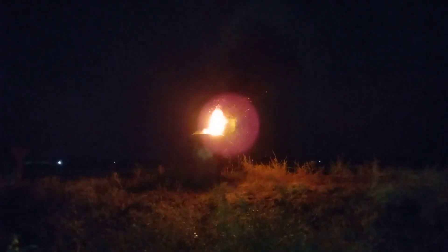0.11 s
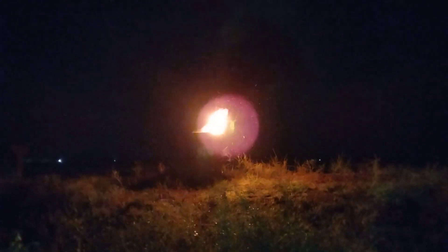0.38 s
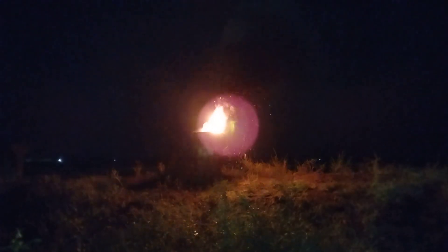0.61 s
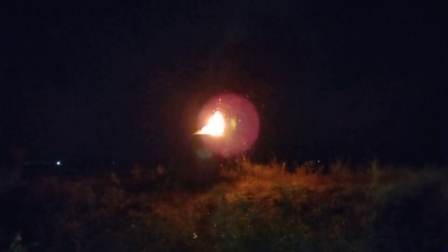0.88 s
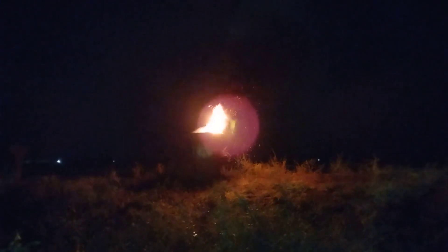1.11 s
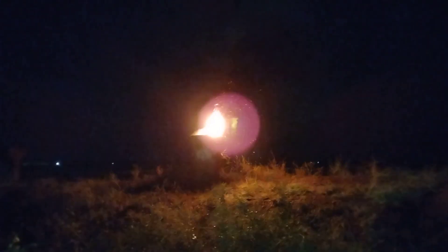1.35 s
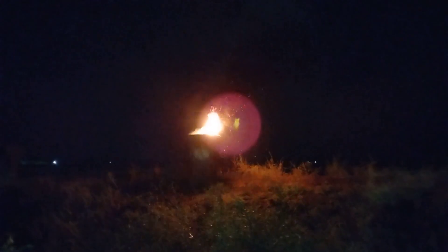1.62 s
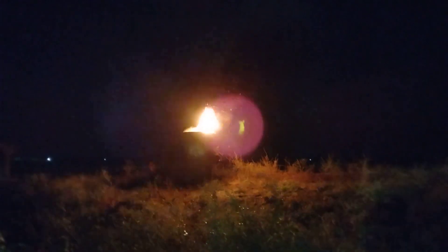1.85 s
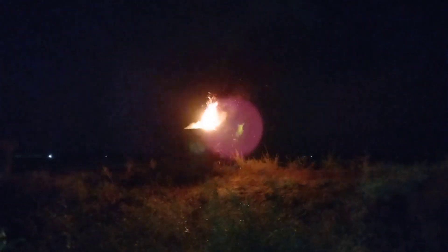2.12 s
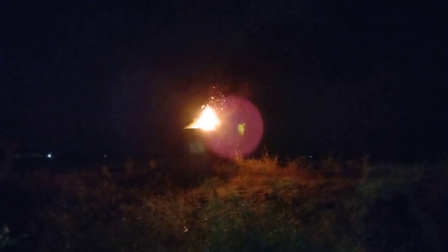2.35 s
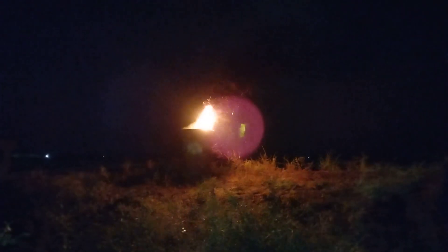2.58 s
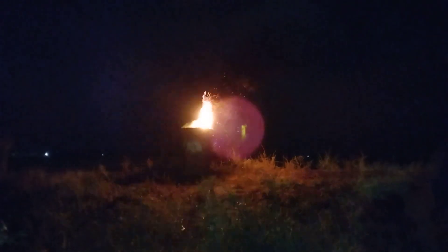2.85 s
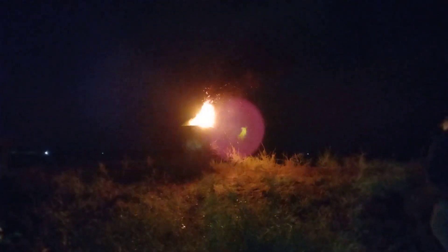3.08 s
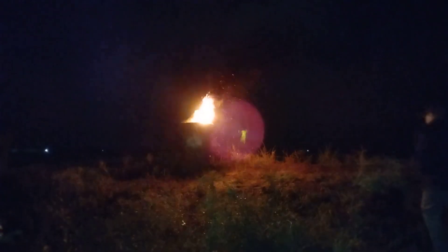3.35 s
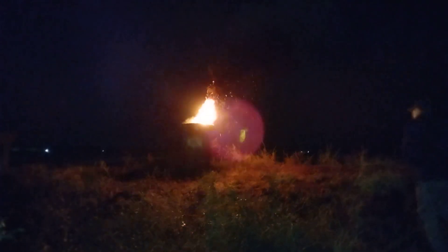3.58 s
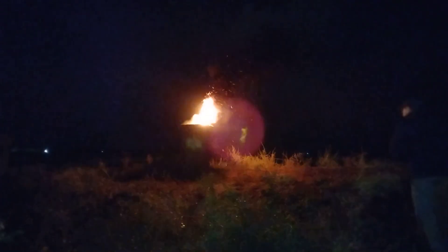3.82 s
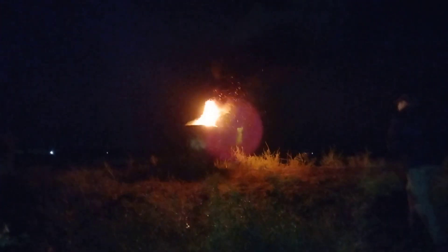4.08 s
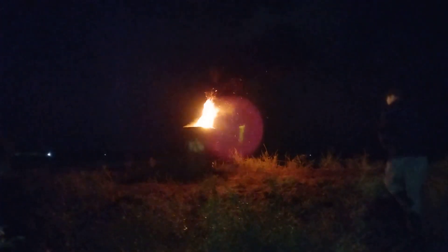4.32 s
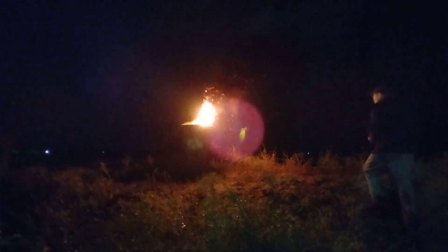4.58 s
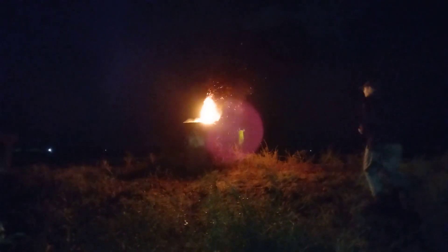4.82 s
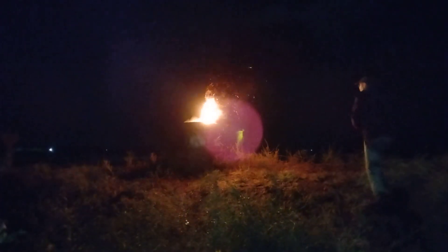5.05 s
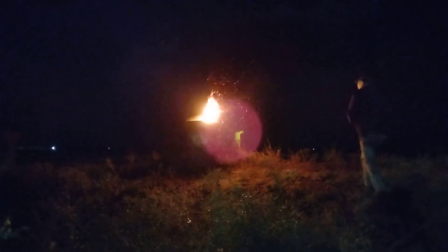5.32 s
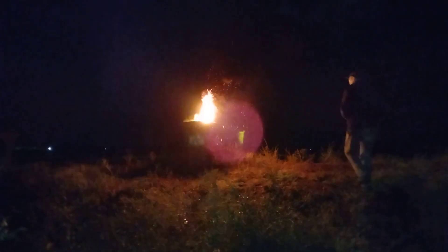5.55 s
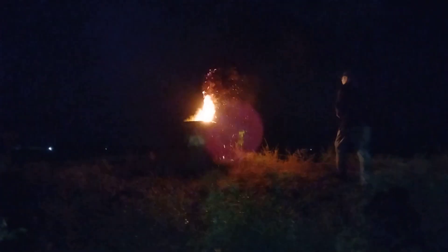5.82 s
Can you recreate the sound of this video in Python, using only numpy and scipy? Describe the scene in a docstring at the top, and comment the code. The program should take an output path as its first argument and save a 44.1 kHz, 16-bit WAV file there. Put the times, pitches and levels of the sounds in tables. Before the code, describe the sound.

Low fluttering wind buffets an unshielded microphone in a night field, with a few dry snaps from a far-off fire and thin steady hiss.

```python
"""A fire burns some way off in a field at night, heard through a bare microphone in the wind.
For two seconds gusts break on it: low noise flutters, eddies thump as smooth lobes of pressure and
sudden pressure steps pop. In the lull that follows, a few dry crackles ring as impulses through resonances.
From three seconds on, gusts return with more thumps and pops, up to the end.
Under all lie two bands of shaped noise: the soft roar of the flames and the hiss of the recorder."""
import sys
import numpy as np
from scipy import signal
from scipy.fft import rfft, irfft, next_fast_len
from scipy.io import wavfile
from scipy.ndimage import uniform_filter1d, minimum_filter1d, map_coordinates

SR = 44100
rng = np.random.default_rng(int(sys.argv[2]) if len(sys.argv) > 2 else 0)


def volts_from_decibels(level):
    """Turn decibel levels (scalar or array-like) into linear amplitude factors."""
    exponent = np.asarray(level, float) / 20
    return 10 ** exponent


def log_audio(samples):
    """Write samples as a 16-bit WAV file to the path given in sys.argv[1]."""
    # one column per channel
    frames = np.atleast_2d(samples).T
    # limit to full scale, then quantise
    limited = np.clip(frames, -1, 1)
    pcm = np.round(limited * 32767).astype(np.int16)
    wavfile.write(sys.argv[1], SR, pcm)


N = 261460  # length in samples


def unit(x):
    """Normalisation: scales a signal to rms 1."""
    return x / np.sqrt(np.mean(x ** 2) + 1e-20)


def filtered(x, response):
    """Linear filtering: multiplies the spectrum by a complex response of frequency in Hz."""
    size = next_fast_len(N + 8192)
    spectrum = rfft(x, size) * response(np.fft.rfftfreq(size, 1 / SR))
    return irfft(spectrum, size)[..., :N]


def noise(spectrum):
    """Spectral shaping: white noise coloured by (hz, db) points on a log frequency axis, rms 1."""
    hz, db = np.transpose(spectrum)
    colour = lambda f: volts_from_decibels(np.interp(np.log(f + 1), np.log(hz + 1), db))
    return unit(filtered(rng.standard_normal(N), colour))


def wobble(rate):
    """Slow random modulation: a smooth curve through `rate` random knots a second."""
    knots = rng.standard_normal(int(N * rate / SR) + 4)
    return map_coordinates(knots, [np.arange(N) * rate / SR])


def add(track, s, sound):
    """Superposition: mixes a sound into the track, starting at s seconds."""
    part = track[round(s * SR):][:len(sound)]
    part += sound[:len(part)]


def gusts():
    """Wind strength: a level in dB interpolated between points, sample by sample."""
    # course of the breeze: time_s, level_db
    breeze_points = [(0.0, -52.5), (0.43, -53.5), (0.76, -49.5), (1.02, -45.5), (1.43, -51), (1.82, -51),
                     (1.96, -50), (2.26, -55.5), (2.54, -51), (3.07, -51.5), (3.45, -52), (3.71, -48.5),
                     (3.86, -43.5), (4.06, -46.5), (4.48, -50), (4.57, -45.5), (5.32, -53), (5.93, -51)]
    s, db = np.transpose(breeze_points)
    return np.interp(np.arange(N) / SR, s, db)


def flutter(gust_db):
    """Turbulent pressure noise: low-pitched, ceaseless, in mild lumps, its level following the gusts."""
    # spectrum of the turbulence: frequency_hz, relative_density_db
    flutter_spectrum = [(8, -21), (20, 1.5), (40, -12), (70, -14.5), (120, -30), (250, -44), (600, -81.5)]
    lumps = volts_from_decibels(2.5 * wobble(15))
    return volts_from_decibels(gust_db + 1.0) * unit(lumps * noise(flutter_spectrum))


def small_eddies(gust_db):
    """Turbulence statistics: rows of chance eddies whose size grows faster than the gusts."""
    count, margin_s = 50, 0.05
    over_gust_db, growth = 12, 1.4  # largest peak over the mean gust level; dB per dB of gust
    least_width_ms, log_spread = 5.9, 0.73
    when, size = rng.random((count, 2)).T
    sign, scatter = rng.standard_normal((count, 2)).T
    s = margin_s + when * (N / SR - 2 * margin_s)
    mean_db = gust_db.mean()
    here_db = gust_db[(s * SR).astype(int)] - mean_db
    peak = np.sign(sign) * size * volts_from_decibels(mean_db + over_gust_db + growth * here_db)
    width_ms = least_width_ms * np.exp(log_spread * np.abs(scatter))
    return list(zip(s, peak, width_ms))


def eddies(gust_db):
    """Vortex pressure: a smooth lobe, then a broader rebound of opposite sign, stronger for big eddies."""
    # strongest eddies: centre_s, lobe_peak_fs (full scale; + push, - suck), width_at_half_height_ms
    strong_eddies = [(0.451, -0.028, 3.05), (0.463, 0.052, 3.5), (0.475, 0.029, 4.5), (0.819, -0.023, 5.8),
                     (0.827, -0.045, 4.9), (0.939, 0.013, 25), (1.022, -0.035, 3.17), (1.038, 0.061, 6.9),
                     (1.062, -0.063, 4.7), (1.089, -0.088, 5.9), (1.165, -0.037, 13.5), (1.208, 0.029, 6.3),
                     (1.257, 0.026, 5.5), (1.303, 0.029, 5.6), (1.39, 0.028, 28), (1.452, -0.076, 9.2),
                     (1.503, -0.021, 3.7), (1.517, -0.032, 4), (1.54, 0.034, 6.1), (1.593, -0.028, 6.7),
                     (1.774, 0.023, 5), (1.796, -0.029, 11.6), (1.923, -0.019, 12), (1.983, -0.023, 5.7),
                     (2.049, 0.032, 3.8), (2.058, 0.063, 8.6), (2.088, 0.023, 6.4), (2.12, -0.021, 18),
                     (3.04, -0.11, 6), (3.062, 0.023, 7.4), (3.255, -0.027, 6), (3.27, -0.022, 7.2),
                     (3.759, -0.02, 12.4), (3.846, -0.021, 16), (3.92, 0.021, 6.3), (4.078, -0.063, 8.5),
                     (4.133, 0.06, 6), (4.169, -0.025, 14), (4.184, 0.049, 6), (4.208, 0.046, 7.9),
                     (4.23, 0.028, 5.1), (4.251, 0.031, 9), (4.484, -0.032, 12.2), (4.602, 0.027, 9.2),
                     (4.627, 0.03, 19), (4.687, -0.043, 7.3), (4.753, 0.033, 4.6), (4.854, -0.036, 8.2),
                     (5.328, -0.02, 3.6), (5.338, 0.024, 7.5), (5.756, -0.034, 3.04), (5.771, 0.045, 7.4),
                     (5.787, 0.033, 8.1)]
    # spectrum of the finer turbulence: frequency_hz, relative_density_db
    grit_spectrum = [(60, -31.5), (130, 3.5), (250, -10), (450, -17.5), (900, -24), (1500, -38),
                     (2500, -95)]
    late, broad = 1.365, 1.28  # delay and width of the rebound, in widths of the lobe
    half_rebound_fs = 0.049  # peak at which the rebound is half as high as the lobe
    grit_db, grit_full_fs = -27, 0.047  # level against eddy strength; strength where growth saturates
    out, lead_s = np.zeros(N), 0.04
    ms = (np.arange(SR // 8) / SR - lead_s) * 1000

    def bell(centre_ms, width_ms):
        return 0.5 ** ((2 * (ms - centre_ms) / width_ms) ** 2)

    for s, peak, width in [*strong_eddies, *small_eddies(gust_db)]:
        rebound = peak ** 2 / (peak ** 2 + half_rebound_fs ** 2)
        lobes = bell(0, width) - rebound * bell(late * width, broad * width)
        add(out, s - lead_s, peak * lobes)
    # big eddies break up into finer, lumpy turbulence
    strength = uniform_filter1d(np.abs(out), size=700)
    limited = grit_full_fs * np.tanh(strength / grit_full_fs)
    grit = limited * volts_from_decibels(grit_db + 3 * wobble(60)) * noise(grit_spectrum)
    return out + grit


def jumps():
    """Step response: a pressure step leaks away in a damped swing and jolts the air in the port."""
    # sudden steps: time_s, nominal_size_fs (full scale; + push, - suck), rise_ms
    pressure_steps = [(0.448, -0.016, 1), (0.4579, -0.017, 0.35), (0.8163, -0.0061, 0.7),
                      (0.829, -0.026, 1.1), (1.026, -0.023, 0.72), (1.0626, -0.0072, 0.35),
                      (1.0726, -0.024, 0.34), (1.087, -0.024, 1.5), (1.1152, -0.0081, 0.71),
                      (1.135, -0.028, 0.85), (1.4905, -0.032, 0.48), (1.512, 0.028, 0.46),
                      (1.81, 0.04, 0.83), (1.9576, 0.032, 0.52), (2.0059, 0.014, 0.3),
                      (2.0327, 0.029, 0.44), (3.0343, -0.015, 0.92), (3.0369, -0.024, 1.1),
                      (4.0654, 0.018, 0.51), (4.1017, 0.026, 2.1), (4.1276, 0.059, 4.1),
                      (4.7502, 0.007, 0.53), (4.851, -0.0031, 0.92), (4.912, -0.013, 0.68),
                      (5.0723, -0.09, 0.42), (5.7482, 0.021, 0.68), (5.7511, 0.016, 0.25),
                      (5.7725, -0.0083, 0.3)]
    leak_hz, leak_t60_s = 82, 0.06
    port_hz, port_t60_s, port_db = 620, 0.00089, -12
    ragged, ragged_s = 0.32, 0.0069  # greatest share and delay of the lesser steps
    out, lead_s = np.zeros(N), 0.03
    t = np.arange(SR // 10) / SR - lead_s
    after = np.maximum(t, 0)
    leak = volts_from_decibels(-60 * after / leak_t60_s) * np.cos(2 * np.pi * leak_hz * after)
    jolt = volts_from_decibels(port_db - 60 * after / port_t60_s) * np.sin(2 * np.pi * port_hz * after)
    # each step tears: two lesser ones of either sign follow
    tears = rng.uniform(-1.005, 1, size=(len(pressure_steps), 2, 2))
    torn = []
    for (s, size, rise_ms), pair in zip(pressure_steps, tears):
        for late, share in pair:
            torn.append((s + ragged_s * abs(late), size * ragged * share, rise_ms))
    for s, size, rise_ms in [*pressure_steps, *torn]:
        half_rise_s = max(rise_ms, 0.1) / 2000
        edge = (1 + t / np.hypot(t, half_rise_s)) / 2
        add(out, s - lead_s, size * edge * (leak + jolt))
    return out


def run_of_snaps(start, length, first_db, last_db, bright):
    """Point process: snaps at uneven short gaps, their level sloping along the run with some scatter."""
    mean_gap_s = 0.0027  # before the uneven factors
    s = mean_gap_s * np.cumsum(np.append(0, rng.uniform(0.76, 1.4, size=12)))
    db = first_db + (last_db - first_db) * s / length + rng.normal(0, 0.85, size=13)
    return [(start + at, level, bright) for at, level in zip(s, db) if at <= length]


def crackles():
    """Impulse excitation: a snap and its decaying splinters ring in the wood; dull ones lack the upper part."""
    # single dry snaps: time_s, relative_level_db, upper_part_weight
    single_snaps = [(2.2787, -39.5, 0.47), (2.3076, -40, 0.82), (2.887, -40, 0.097), (2.8992, -36.5, 0.11),
                    (2.9184, -40.5, 1.27), (2.9218, -36.5, 0.11)]
    # quick runs of small snaps: start_s, length_s, first_relative_db, last_relative_db, upper_part_weight
    snap_runs = [(2.84, 0.0208, -55, -61, 2.1), (2.907, 0.0086, -43, -39.5, 0.36),
                 (2.919, 0.031, -44, -59, .2)]
    # resonances of the wood: frequency_hz, bandwidth_hz, relative_gain_db
    wood_modes = [(660, 320, 4), (1040, 190, 8), (1500, 330, 5), (2450, 200, 5), (3360, 290, -8)]
    gain_db, splinter_db, splinter_t60_s = 17, -6, 0.016
    dull_hz, far_hz = 1200, 3800  # corners of two-pole lowpasses
    full, sharp = np.zeros(N), np.zeros(N)
    t = np.arange(SR // 25) / SR
    snaps = [*single_snaps]
    for run in snap_runs:
        snaps += run_of_snaps(*run)
    for (s, db, bright), splinters in zip(snaps, rng.standard_normal((45, len(t)))):
        burst = volts_from_decibels(-60 * t / splinter_t60_s) * splinters
        burst *= volts_from_decibels(splinter_db) / np.linalg.norm(burst)
        burst[0] = 1  # the snap itself
        add(full, s, volts_from_decibels(db + gain_db) * burst)
        add(sharp, s, volts_from_decibels(db + gain_db) * bright * burst)

    def lowpass(f, corner_hz):
        return 1 / (1 + 1j * f / corner_hz) ** 2

    def ring(f):
        total = 0
        for k, (centre, width, db) in enumerate(wood_modes):
            mode = 1j * f * width / (centre ** 2 - f ** 2 + 1j * f * width)
            total = total + (-1) ** k * volts_from_decibels(db) * mode  # neighbours in opposite phase
        return total

    lower = filtered(full, lambda f: lowpass(f, dull_hz))
    upper = filtered(sharp, lambda f: 1 - lowpass(f, dull_hz))
    # distance takes the top off
    return filtered(lower + upper, lambda f: ring(f) * lowpass(f, far_hz))


def flames():
    """Combustion noise: the far broadband roar of burning, swelling a little."""
    # spectrum of the roar: frequency_hz, relative_density_db
    roar_spectrum = [(60, -13), (150, -1), (300, -5), (700, -10), (1400, -15), (2000, -12.5), (2500, -19),
                     (3000, -25.5), (5000, -40), (9000, -82)]
    level_db = -72.5 + 0.4 * wobble(3.04) + 0.99 * wobble(30)
    return volts_from_decibels(level_db) * noise(roar_spectrum)


def scene():
    """Superposition of the wind at the port and the fire beyond, in one channel."""
    gust_db = gusts()
    wind = flutter(gust_db) + eddies(gust_db) + jumps()
    fire = crackles() + flames()
    return (wind + fire)[None]


def band_limit(x):
    """A steep low-pass at the top of the band."""
    return signal.sosfilt(signal.butter(12, 16680, fs=SR, output="sos"), x)


def record(dry):
    """Signal-dependent noise: the recorder's hiss rises around large peaks; a sharp lowpass ends the band."""
    # spectrum of the hiss: frequency_hz, relative_density_db
    hiss_spectrum = [(300, 3), (3000, 0), (6000, -2.5), (10000, -2.5), (13000, -2.5), (14500, 1.5),
                     (15800, -0.5)]
    quiet_db, rise_db, threshold_db, top_hz = -75.5, 4.3, -36.0, 15750
    held = -minimum_filter1d(-np.abs(dry), size=400)  # running peak over 9 ms
    large = 1 / (1 + (volts_from_decibels(threshold_db) / (held + 1e-9)) ** 5)  # from 0 to 1 across the threshold
    hiss_db = quiet_db + rise_db * uniform_filter1d(large, size=60) + 0.15 * wobble(25)
    hiss = volts_from_decibels(hiss_db) * noise(hiss_spectrum)
    mix = filtered(dry + hiss, lambda f: f < top_hz)
    return band_limit(mix)


dry = scene()
out = record(dry)
log_audio(out)
```